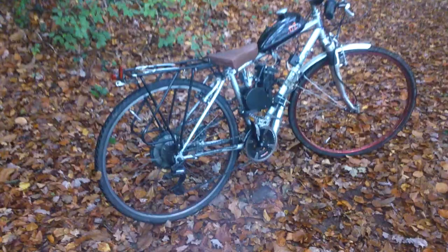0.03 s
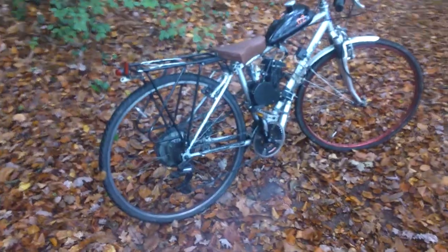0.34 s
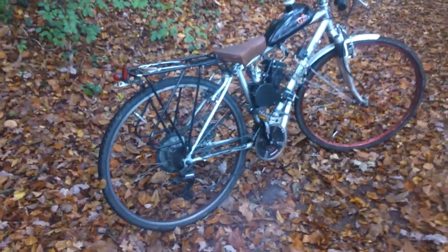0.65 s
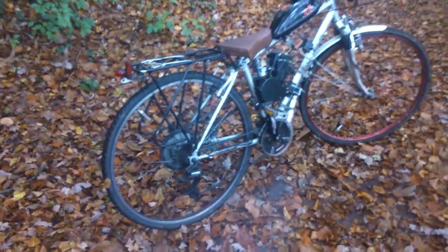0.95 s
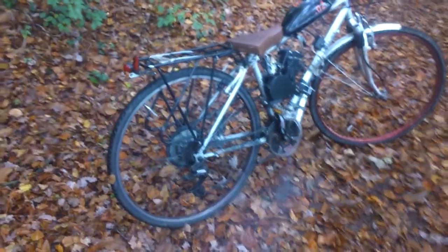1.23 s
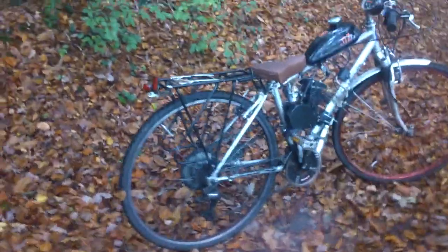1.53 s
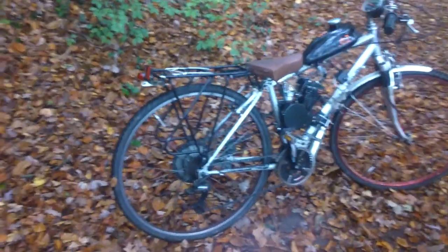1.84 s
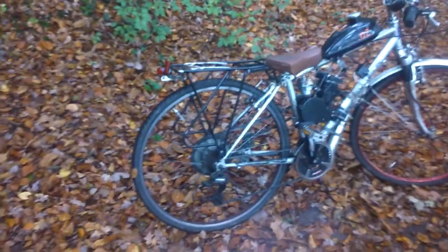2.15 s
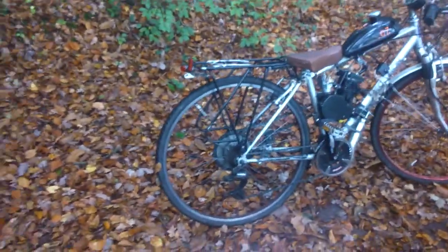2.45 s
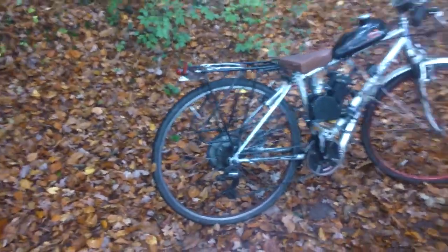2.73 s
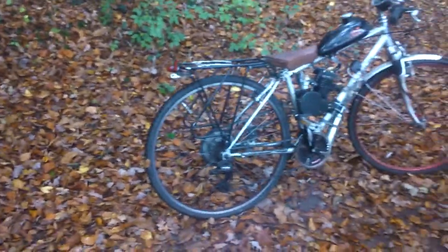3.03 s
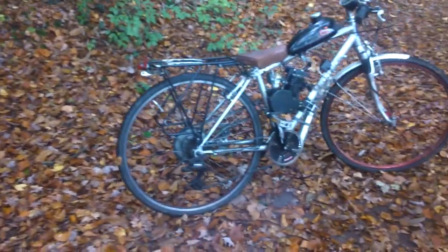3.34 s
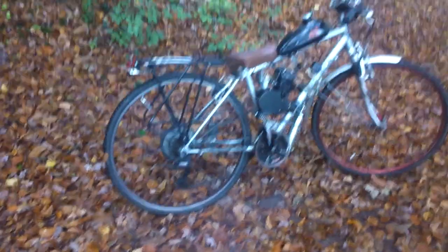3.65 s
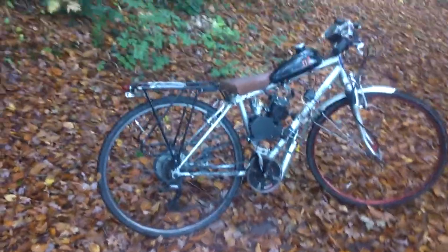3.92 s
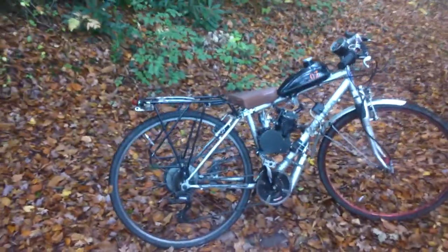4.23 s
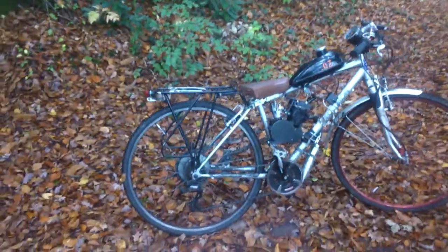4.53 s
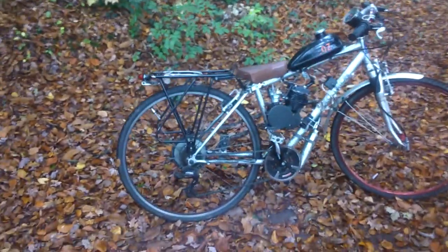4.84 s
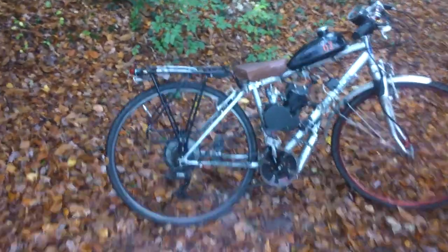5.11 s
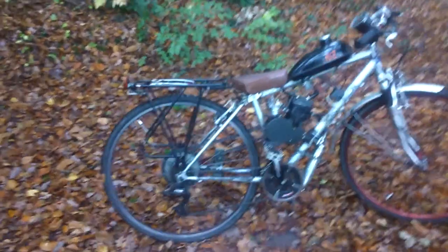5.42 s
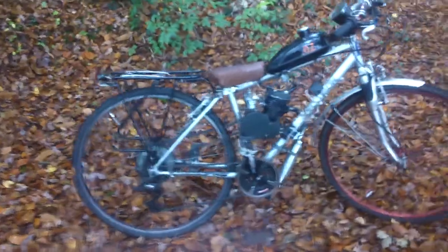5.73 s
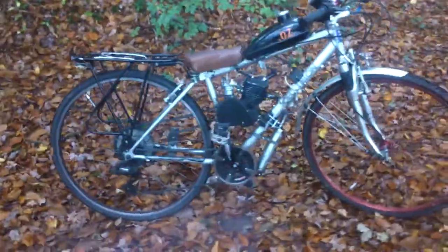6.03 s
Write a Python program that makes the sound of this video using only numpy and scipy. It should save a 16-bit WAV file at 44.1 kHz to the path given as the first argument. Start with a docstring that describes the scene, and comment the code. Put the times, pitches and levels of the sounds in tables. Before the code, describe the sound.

At about 0.4 seconds the sound starts abruptly: a small two-stroke engine on a bicycle, already idling a couple of metres away. It keeps going to the end, a little after 6 seconds, without revving. The exhaust fires unevenly, roughly four to sixteen times a second, each firing a short, low bark with a spit of hiss, and soft puffs fill the spaces. Slightly longer gaps between pops come near 1.1, 1.5, 2.8 and 5.4 seconds. Alongside runs a steady, fast mechanical clatter of about thirty beats a second, made of ringing piston knocks, rasping gears and a rattling case. Three faint, high pings of loose metal fall between 4.1 and 4.4 seconds. The metallic ringing shifts gently in tone and grows a little stronger from about 5.5 seconds. The woodland adds only a faint, dull reverberation.

```python
"""On a leafy woodland floor, a bicycle's small two-stroke engine idles a couple of metres away.
It turns about 31 times a second but fires only every second to eighth turn. Each firing excites the
silencer's resonances (a bark) and a turbulent jet (a hiss); soft puffs die away as the crank coasts.
On every turn the piston's impact rings the finned cylinder and the gears rasp under compression.
A loose part pings now and then, and trunks and leaves scatter a faint reverberation."""
import sys
import numpy as np
from scipy import signal
from scipy.fft import rfft, irfft, next_fast_len
from scipy.io import wavfile

SR = 44100
rng = np.random.default_rng(int(sys.argv[2]) if len(sys.argv) > 2 else 0)


def int16_out(signal):
    """Quantize to a 16-bit WAV file."""
    q = np.round(np.clip(np.atleast_2d(signal).T, -1, 1) * 32767)
    wavfile.write(sys.argv[1], SR, q.astype(np.int16))


N = 272097
TIME = np.arange(N) / SR

# firings: (exhaust opening [s], turns to the next [count], strength [dB], piston slap [dB])
FIRINGS = [(.349, 3, 4, 4), (0.4428, 2, -1, 2), (0.5085, 3, 2.5, 2), (0.6026, 3, 2, 3), (0.6949, 5, 5, 7),
           (0.8356, 4, 4.5, 5), (0.9497, 2, 0.5, 4), (1.0084, 8, 6, 2), (1.2326, 4, 5.3, 7),
           (1.3448, 3, 2, 4), (1.4315, 7, 3, 2), (1.645, 3, 3.5, 0), (1.74, 3, 2, 0), (1.836, 3, -1.5, 1.5),
           (1.9332, 2, -0.5, 1.5), (1.9989, 3, 2.5, 2.5), (2.097, 3, 0, 3), (2.1988, 3, 2, 3.5),
           (2.2973, 3, 3, 4), (2.3947, 4, 2, 3), (2.5287, 3, 3.5, 4), (2.623, 2, -1, 4), (2.688, 8, 5, 4),
           (2.9356, 6, 5, 2.5), (3.1178, 2, 1, 3), (3.1809, 5, 1.5, 6), (3.3408, 4, 0, 0.5),
           (3.4711, 2, -2, 5), (3.5366, 3, 2, 4.5), (3.6319, 4, 3.5, 2.5), (3.7612, 3, 1.2, 3),
           (3.8576, 4, 5, 6.5), (3.9814, 3, 2.3, 4.5), (4.077, 3, 2, 3.5), (4.173, 3, 3, 0),
           (4.2675, 3, 3, 1.5), (4.3609, 2, -2.5, 4.5), (4.4243, 4, 4, 6), (4.5426, 5, 1, 5),
           (4.698, 5, -1, 1), (4.8652, 5, 2.7, 0.5), (5.037, 3, 3, 3), (5.1429, 4, 5, 4),
           (5.2744, 7, 6, -2), (5.486, 2, 4, 2.5), (5.5538, 3, -0.5, -0.5), (5.654, 5, 6, 5),
           (5.804, 4, 6, 4), (5.923, 4, 1.5, 2), (6.0493, 5, 3, 3.5), (6.209, 3, 2, 3)]
# cylinder as the listener moves around the bicycle: (time [s], level [dB], emphasised frequency [Hz])
CYLINDER_RADIATION = [(.45, -2, 1640), (1.15, -1.5, 1550), (1.9, 2, 1540), (2.7, 0.5, 1585),
                      (3.6, -1.5, 1694), (5.3, .5, 1494), (5.7, 2.5, 1490), (6.15, 5, 1420)]


def barks(fired, strength_db):
    """Impulse excitation: each firing rings the silencer; the port's gradual opening acts as a low-pass."""
    # silencer after a firing: (frequency [Hz], gain [dB], t60 [s])
    bark_modes = [(58.4, -36.5, 0.066), (98.5, -17.5, 0.038), (250.5, -2, 0.013), (195, -4.5, 0.013)]
    pulses = clicks(fired, from_db(strength_db))
    return signal.lfilter(*signal.butter(2, 1100, fs=SR), resonator(pulses, bark_modes))


def puffs(coasting, lost, level_db, fail_db=24):
    """Pumping: unburnt charge rings the silencer softly; as a puff fails, backflow takes its place."""
    # silencer on a coasting turn: (frequency [Hz], gain [dB], t60 [s])
    puff_modes = [(565, -31, 0.012), (114, -18.5, 0.027), (188, -12.5, 0.026)]
    # hollower ring of gas flowing back into the cylinder: (frequency [Hz], gain [dB], t60 [s])
    backflow_modes = [(308, -22, 0.03), (116, -18, 0.039)]
    puff_gain = from_db(-fail_db * lost)
    outflow = clicks(coasting, from_db(level_db) * puff_gain)
    backflow = clicks(coasting, np.sqrt(1.001 - puff_gain ** 2))
    return resonator(outflow, puff_modes) + resonator(backflow, backflow_modes)


def coasting_turns(slowing, hurry):
    """Inertia: the crank slows until a firing hurries it on. Gives unfired times and shares of flow lost."""
    times, lost = [], []
    for (start, turns, strength_db, _), (end, *_) in zip(FIRINGS, FIRINGS[1:]):
        lengths = 1 + slowing * np.arange(round(turns))
        lengths[-1] -= hurry
        times.extend(start + (end - start) * np.cumsum(lengths)[:-1] / lengths.sum())
        lost.extend(lost_flow(len(lengths), (end - start) / len(lengths), strength_db))
    return np.array(times) + rng.normal(0, .0003, len(times)), np.array(lost)


def lost_flow(turns, turn_s, strength_db, idle_turn_s=0.031, fail_turns=0.44, recovery_per_turn=0.17):
    """Gas inertia: flow outlasts a firing by some turns, fewer if it was weak or the crank is slow."""
    turns_since = np.arange(1, turns)
    lasting_turns = (1.22 + 0.88 * from_db(strength_db) ** 2) * (idle_turn_s / turn_s) ** 2.5
    lost = (1 + np.tanh((turns_since - lasting_turns) / fail_turns)) / 2
    # in a long gap fresh charge builds up, and flow returns just before the next firing
    recovered = np.clip(recovery_per_turn * (turns_since - 1), 0, 1) * (turns_since == turns - 1)
    return lost * (1 - recovered)


def exhaust_hiss(fired, strength_db, growth=1.5):
    """Jet noise: burnt gas spits from the opening port, growing faster with strength than the bark."""
    # jet envelope: (time from exhaust opening [s], level [dB])
    jet_envelope = [(-.001, -15), (.0005, -2), (.002, -9.5), (.004, -7.5), (.008, -16.5), (0.017, -23)]
    # jet spectrum: (frequency [Hz], spectral level [dB])
    jet_spectrum = [(200, -3), (550, -12.5), (750, -2), (1500, -8), (3000, -8), (4700, -4.5), (5400, 4),
                    (6200, -2.5), (7100, 4), (9000, -1.5), (11800, -8.5), (15800, -9)]
    jet = strokes(fired, growth * strength_db, jet_envelope) * rng.standard_normal((2, N))
    return rms_one(colour(jet, jet_spectrum))


def cylinder(turns, slap_db, force, blow_db, blow_lead_s, contacts_per_s, focus_db, focus_width_hz):
    """Impact excitation: the piston hits the wall once a turn and chatters, ringing the cylinder's modes."""
    # cylinder and cooling fins: (frequency [Hz], relative gain [dB], t60 [s])
    fin_modes = [(1310, -16, 0.006), (1390, -3.5, 0.068), (1477.5, -1.5, 0.05), (1565, -4.5, 0.045),
                 (1648, -1, 0.028), (1725, -0.5, 0.042), (2032, -5.5, 0.058), (2310, -14, 0.079),
                 (2359, -3, 0.085), (2413, -8, 0.059), (3360, -7.5, 0.071), (3944, -6.5, 0.018),
                 (4200, -12, 0.0081), (6600, -9, 0.019), (9470, -3.5, 0.046)]
    chatter = np.flatnonzero(rng.random(N) < contacts_per_s / SR)
    blows = turns - blow_lead_s + rng.normal(0, .0004, len(turns))
    times = np.r_[chatter / SR, blows]
    sizes = np.r_[force[chatter], from_db(slap_db + blow_db)]
    focus_hz = curve(CYLINDER_RADIATION, times, column=2)
    ringing = np.zeros((2, N))
    for hz, db, t60 in fin_modes:
        emphasis_db = focus_db * np.exp(-((hz - focus_hz) / focus_width_hz) ** 2)
        strengths = sizes * from_db(db + emphasis_db)
        polarities = rng.choice([-1, 1], (2, len(times)))
        ringing += [ring(clicks(times, strengths * signs), hz, t60) for signs in polarities]
    return rms_one(ringing)


def gears(turns, uneven_db, clink_db):
    """Contact noise: compression takes up the backlash, and the teeth rasp until the load falls away."""
    # tooth load through one turn: (time from exhaust opening [s], level [dB])
    tooth_load = [(-.0172, -8), (-.016, 3), (-.011, 2), (0, -1), (.008, -8), (0.0159, -4)]
    # response of the gears: (frequency [Hz], gain [dB])
    gear_response = [(150, -14), (450, -3), (800, -3), (1400, 7.5), (2100, 3), (2900, -5.5), (3900, 0),
                     (4600, -2.5), (5100, -1.5), (7000, 3), (8600, -2), (9700, 0), (11800, -10.5),
                     (15800, -8)]
    meshing = turns + rng.normal(0, .0009, len(turns))
    load = strokes(meshing, uneven_db * rng.standard_normal(len(turns)), tooth_load)
    scrape = rms_one(load * grains(per_s=36000, spread_db=0))
    clinks = from_db(clink_db) * rms_one(teeth(load, per_s=1800, low_hz=3113, high_hz=10960, t60=0.023))
    return rms_one(colour(scrape + clinks, gear_response))


def teeth(load, per_s, low_hz, high_hz, t60, count=24):
    """Free vibration: single teeth catch under load, each clinking at its own natural frequency."""
    catches = load * grains(per_s, spread_db=3)
    tooth = rng.integers(0, count, N)
    pitches = np.geomspace(low_hz, high_hz, count)
    return sum(ring(catches * (tooth == k), hz, t60) for k, hz in enumerate(pitches))


def crankcase(slap, floor_db):
    """Forced vibration: the piston's slap shakes the case, which keeps rattling in between."""
    # response of the case: (frequency [Hz], gain [dB])
    case_response = [(100, -33), (250, 0.5), (430, 9), (600, 4.5), (850, -11), (1300, -22), (2500, -5),
                     (4000, -6), (7000, -2.5), (15000, -18.5)]
    shake = np.hypot(rms_one(slap), from_db(floor_db))
    return rms_one(colour(shake * grains(per_s=20000, spread_db=1), case_response))


def pings(level_db, bounce_s):
    """Rebound: on a few hard firings loose metal touches three times in quick succession and rings."""
    # first contacts: (time [s], relative level [dB])
    contacts = [(4.0763, -8.5), (4.172, -18.5), (4.424, -8.5)]
    # the loose part: (frequency [Hz], gain [dB], t60 [s])
    metal_modes = [(5260, 6, 0.022), (5650, 8, 0.015), (5800, -9, .025)]
    times, contact_db = np.transpose(contacts)
    taps = sum(clicks(times + k * bounce_s, from_db(contact_db + level_db)) for k in range(3))
    return resonator(taps, metal_modes, first_sign=1)


def treble_dip(x, hz, width_hz):
    """Time-varying filtering: one treble band of the clatter fades and returns over time."""
    # gain of that band: (time [s], gain [dB])
    band_gain = [(.4, .5), (2, -0.5), (2.78, -10), (3.2, -0.5), (5.1, -3.5), (6.15, 4)]
    band = signal.lfilter(*signal.iirpeak(hz, hz / width_hz, fs=SR), x)
    return x + (from_db(curve(band_gain, TIME)) - 1) * band


def widen(mid_side):
    """Coherence and delay: middle and side become left and right, partly alike, the right one late."""
    # likeness of the two sides: (frequency [Hz], coherence [0-1])
    coherence = [(100, 0.03), (700, 1), (1400, 0.97), (2200, 0.76), (4000, 0), (8000, 0.05), (15000, 0.8)]
    # earlier arrival on the left: (frequency [Hz], phase lead [rad])
    left_lead = [(1200, 0), (1500, 0.1), (1810, 1.55), (2150, 1.5), (2500, 1.47), (3400, 5), (6100, 10),
                 (9800, 11.5), (15000, 25.5)]
    size = next_fast_len(N)
    hz = np.fft.rfftfreq(size, 1 / SR)
    alike = np.clip(at_hz(coherence, hz), 0, 1)
    mid, side = rfft(mid_side, size) * np.sqrt([1 + alike, 1 - alike]) / np.sqrt(2)
    delay = np.exp(-1j * at_hz(left_lead, hz))
    return irfft([mid + side, (mid - side) * delay], size)[:, :N]


def woodland(x, t60, tail_db, first_echo_s=.012):
    """Scattering: trunks and leaves return a faint, dull tail that decays exponentially."""
    t = np.arange(SR // 2) / SR
    scatter = rng.standard_normal((2, len(t))) * from_db(-60 * t / t60) * (t > first_echo_s)
    scatter = signal.lfilter([1], [1, -.5], scatter)
    scatter /= np.sqrt(np.sum(scatter ** 2, axis=1, keepdims=True))
    return x + from_db(tail_db) * signal.oaconvolve(x, scatter, axes=1)[:, :N]


def resonator(drive, modes, first_sign=-1):
    """Modal superposition: one drive rings all modes, with alternating signs."""
    return sum(first_sign * (-1) ** k * from_db(db) * ring(drive, hz, t60)
               for k, (hz, db, t60) in enumerate(modes))


def ring(drive, hz, t60):
    """Damped oscillator: a unit impulse starts a decaying sine of height 1."""
    radius, angle = from_db(-60 / (t60 * SR)), 2 * np.pi * hz / SR
    return signal.lfilter([0, np.sin(angle)], [1, -2 * radius * np.cos(angle), radius ** 2], drive + 1e-18)


def clicks(times, sizes):
    """Impulse train: one click at each time."""
    return np.bincount(np.round(times * SR).astype(int), sizes, N)[:N]


def strokes(times, level_db, envelope):
    """Incoherent addition: one envelope lies around each time, and overlaps add in power."""
    offsets = np.arange(envelope[0][0], envelope[-1][0], 1 / SR)
    onsets = clicks(times + offsets[0], from_db(level_db) ** 2)
    power = signal.fftconvolve(onsets, from_db(curve(envelope, offsets)) ** 2)
    return np.sqrt(np.maximum(power[:N], 0))


def grains(per_s, spread_db):
    """Shot noise: tiny random contacts of uneven size, as a middle and a side part."""
    touching = rng.random(N) < per_s / SR
    return rms_one(touching * from_db(spread_db * rng.standard_normal(N)) * rng.standard_normal((2, N)))


def colour(x, spectrum, size=2048):
    """Minimum-phase filtering: folding the cepstrum gives a causal response with this spectrum."""
    gain = from_db(at_hz(spectrum, np.fft.rfftfreq(size, 1 / SR)))
    cepstrum = irfft(np.log(gain))
    cepstrum[1:size // 2] *= 2
    cepstrum[size // 2 + 1:] = 0
    response = irfft(np.exp(rfft(cepstrum)))
    return signal.oaconvolve(np.atleast_2d(x), response[None], axes=1)[:, :N]


def at_hz(points, hz):
    """Interpolation of a spectrum on a log-frequency axis."""
    knots, values = np.transpose(points)
    return np.interp(np.log(np.maximum(hz, 1)), np.log(knots), values)


def curve(rows, at, column=1):
    """Linear interpolation of one column of a table."""
    columns = np.transpose(rows)
    return np.interp(at, columns[0], columns[column])


def from_db(db):
    """Decibels to amplitude ratio."""
    return 10 ** (np.asarray(db) / 20)


def rms_one(x):
    """Normalisation to unit rms."""
    return x / np.sqrt(np.mean(x ** 2) + 1e-20)


def scene():
    """Superposition of exhaust, piston and gears, all timed by the crank."""
    # piston's force on the wall: (time from exhaust opening [s], level [dB])
    slap_force = [(-.017, -27), (-.0074, -24.5), (-.0064, 2.5), (-.0045, 1), (-.003, -10.5), (.002, -23.5),
                  (0.015, -30)]
    fired, _, strength_db, fired_slap_db = np.transpose(FIRINGS)
    coasting, lost = coasting_turns(slowing=.02, hurry=0.054)
    turns = np.r_[fired, coasting]
    exhaust = barks(fired, strength_db) + puffs(coasting, lost, level_db=4)
    coasting_slap_db = 0.93 * rng.standard_normal(len(coasting))
    slap_db = curve(CYLINDER_RADIATION, turns) + np.r_[fired_slap_db, coasting_slap_db]
    # with no combustion pressure to hold it back, the piston crosses over sooner
    slap_times = np.r_[fired, coasting - 0.001296]
    slap = strokes(slap_times, slap_db, slap_force)
    fins = from_db(-26) * cylinder(slap_times, slap_db, slap, blow_db=5.5, blow_lead_s=.0061,
                                   contacts_per_s=4500, focus_db=7.5, focus_width_hz=137)
    rattle = from_db(-37.5) * crankcase(slap, floor_db=1)
    hiss = from_db(-30) * exhaust_hiss(fired, strength_db)
    rasp = from_db(-25) * gears(turns, uneven_db=0.54, clink_db=-5.5)
    clatter = widen(treble_dip(fins + rattle + hiss + rasp, hz=4190, width_hz=890))
    return woodland(exhaust + clatter + pings(level_db=-8, bounce_s=.0011), t60=0.6, tail_db=-22.5)


def record(dry, start_s=.382, ceiling=.87, low_hz=48, high_hz=15900):
    """Transduction: two ports colour the sound; it starts abruptly, soft-clipped and band-limited."""
    # left microphone port, shaded in the treble: (frequency [Hz], gain [dB])
    left_port = [(60, 3.5), (200, .5), (700, 0.9), (1400, 0.5), (2350, 3.5), (2900, 5), (3500, 2.5),
                 (4500, 2), (5100, -10), (5900, -10), (7000, -25.5), (9700, -16.5), (11500, -22),
                 (15500, -28)]
    # right microphone port: (frequency [Hz], gain [dB])
    right_port = [(60, 7.5), (200, -1), (700, -1.85), (1500, 1), (2350, -3), (2800, -1), (3500, -5),
                  (4000, 4), (5200, -0.5), (15000, 2)]
    heard = np.vstack([colour(dry[0], left_port), colour(dry[1], right_port)]) * (TIME > start_s)
    heard = signal.sosfilt(signal.butter(3, low_hz, "high", fs=SR, output="sos"), heard)
    heard = heard / (1 + (heard / ceiling) ** 6) ** (1 / 6)
    return signal.sosfilt(signal.ellip(12, .1, 80, high_hz, fs=SR, output="sos"), heard)


dry = scene()
out = record(dry)
int16_out(out)
```